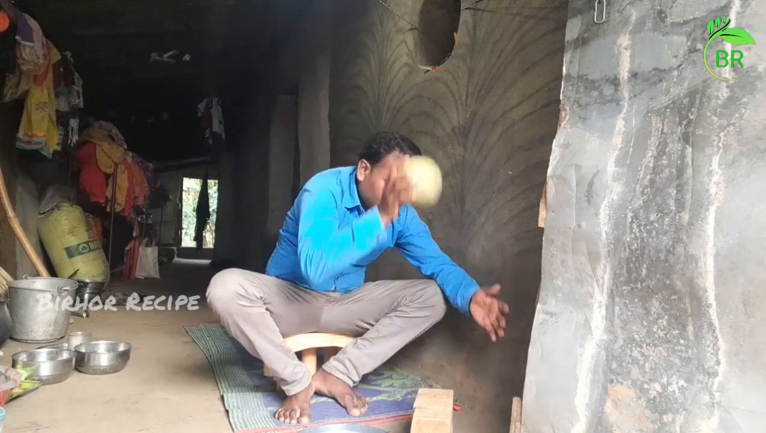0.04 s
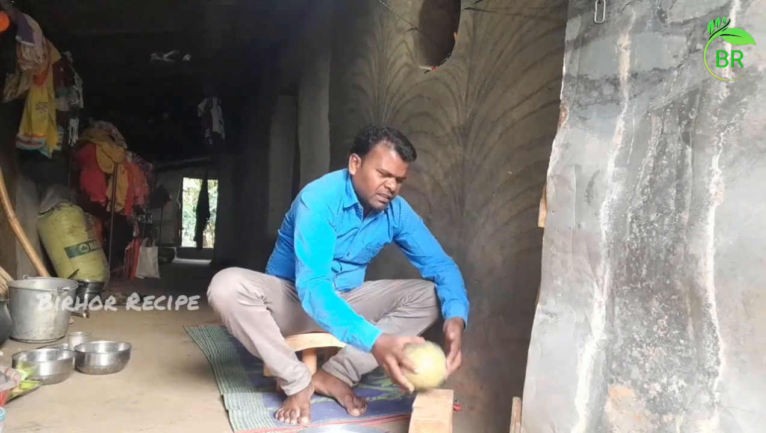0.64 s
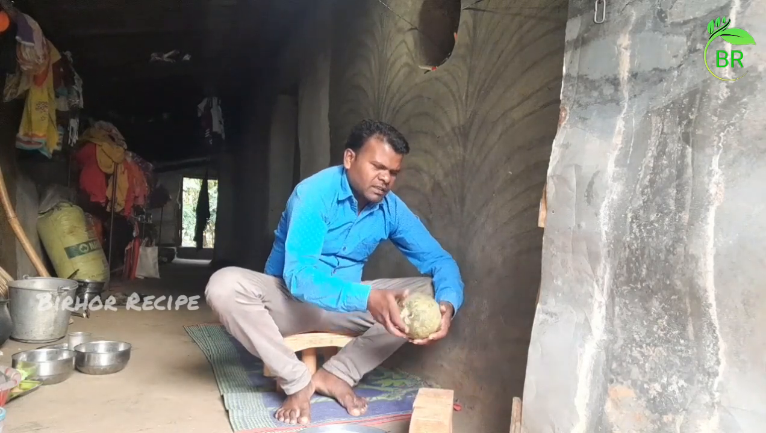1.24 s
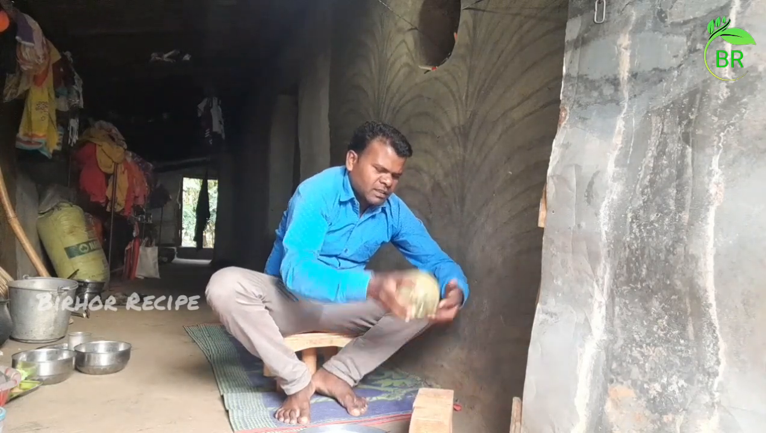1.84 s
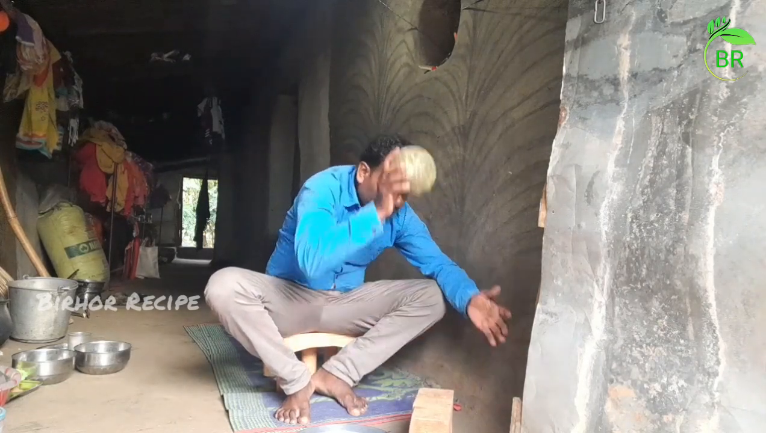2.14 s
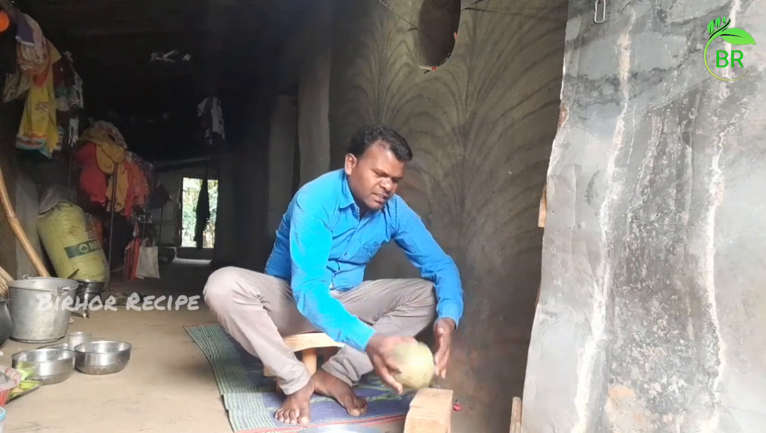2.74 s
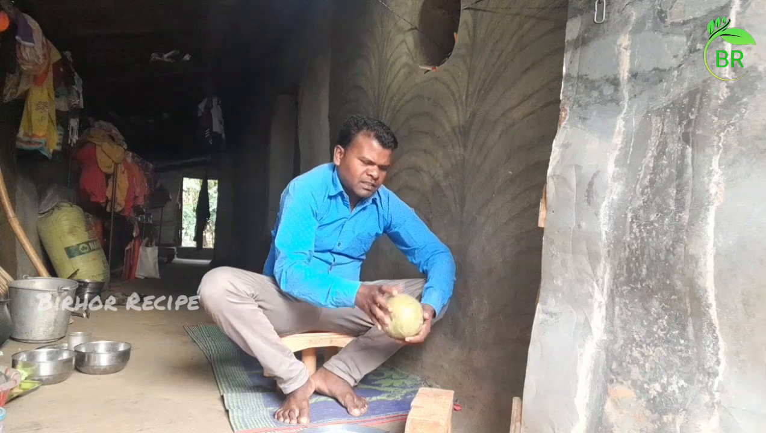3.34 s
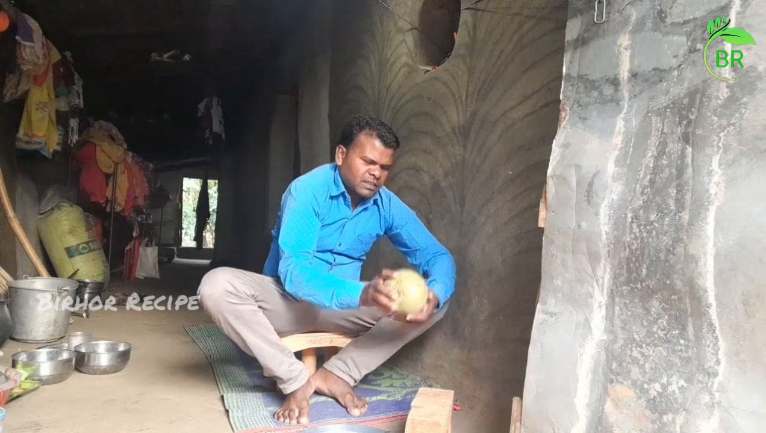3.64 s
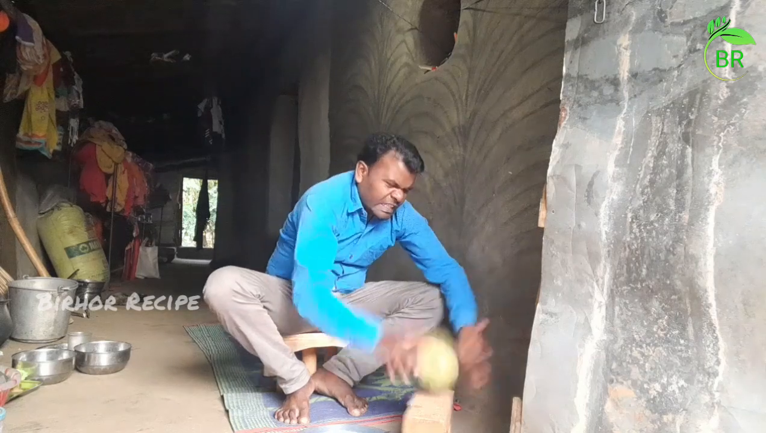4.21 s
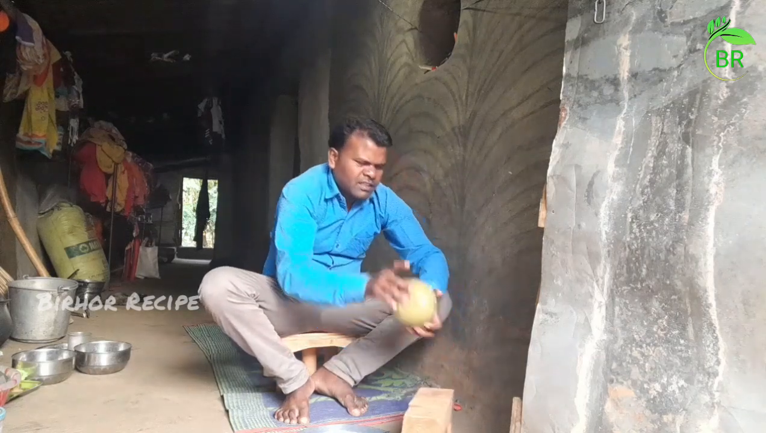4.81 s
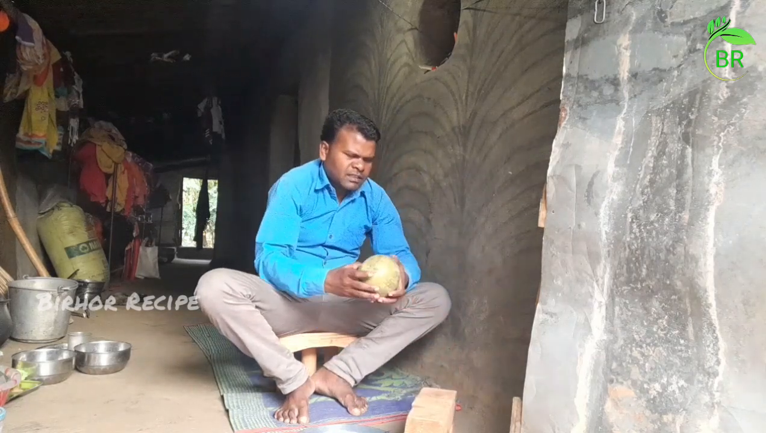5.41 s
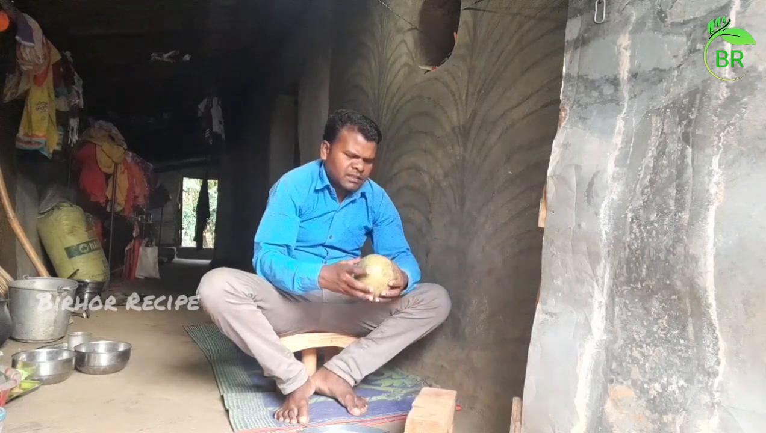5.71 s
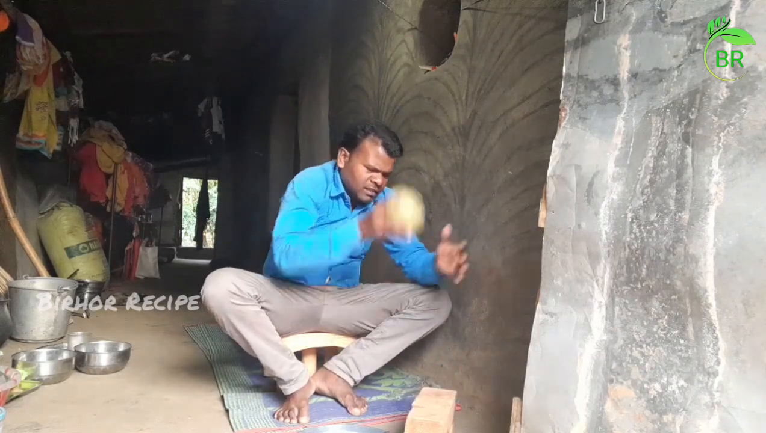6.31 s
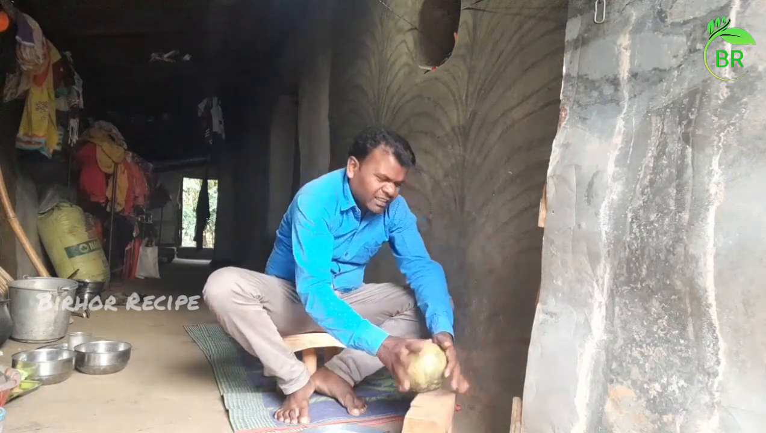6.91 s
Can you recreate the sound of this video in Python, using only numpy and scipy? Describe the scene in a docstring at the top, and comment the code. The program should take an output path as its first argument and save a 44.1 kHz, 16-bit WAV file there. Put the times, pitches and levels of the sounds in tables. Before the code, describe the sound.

A hard-shelled fruit is slammed on a wooden block four times in a small earthen room. Each blow follows a faint sleeve swish and lands as a loud, sharp crack with a low thud through block and floor, dying away quickly. The first comes at 0.3 seconds, followed by a woody knock and ticking shell chips around 0.5. The second lands at 2.4 seconds, with another knock just after. A bird gives a very faint, thin double chirp outside at 2.9. The third blow hits at 4.3 seconds, followed by a knock, then a run of lighter knocks and a chip tick until 5 seconds. The last crack comes at 6.8 seconds, with a bright chip tick and a small knock near 7. Sleeves and palms rustle softly between blows, over a quiet, steady low rumble and thin hiss.

```python
"""A faint swish of sleeve, then a sharp crack: a hard-shelled fruit is slammed on a wooden block,
four times in all, in a small earthen room. Each blow snaps on the shell and thuds through block
and floor. The fruit drops back with softer knocks, and chips of shell tick down.
Sleeves and palms rustle between the blows, and a bird chirps faintly outside, over a low room tone."""
import sys
import numpy as np
from scipy import signal
from scipy.fft import rfft, irfft, next_fast_len
from scipy.io import wavfile
from scipy.ndimage import uniform_filter1d

SR = 44100
rng = np.random.default_rng(int(sys.argv[2]) if len(sys.argv) > 2 else 0)


def wav_out(sig):
    """Save sig, one row per channel (or a flat mono array), as 16-bit PCM at SR to the path in sys.argv[1]."""
    wavfile.write(sys.argv[1], SR, np.round(np.clip(np.atleast_2d(sig).T, -1, 1) * 32767).astype(np.int16))


N = 315315

# full blows: (time [s], crack [dB], treble tilt [dB/octave], shell ring [factor],
# block thud [dB], floor boom [dB], thud pitch [factor])
BLOW_HITS = [(0.2844, 15, -0.12, 0.93, -17.5, -22, 0.93), (2.3974, 15.5, -1, 0.99, -25, -22.5, 0.97),
             (4.2787, 15.5, -0.42, 0.71, -18.5, -20.5, 0.97), (6.7633, 12, 0.05, 0.43, -15, -17, 0.99)]
# soft knocks on the block: (time [s], clack [dB], shell tick [dB], thud [dB], thud pitch [factor])
SOFT_KNOCKS = [(0.452, 6.5, -13.5, -17, 1), (2.5593, 7, -10.5, -20.5, 1.05), (4.4237, 0, -17.5, -25, 1.17),
               (4.68, -6, -36, -22.5, 1.04), (4.748, -14.5, -46, -28, 0.957),
               (4.8185, -7.5, -33, -26.5, 1.07), (4.9309, -17, -51, -33.5, 1.11),
               (4.944, -21, -38, -37, 1.15), (4.984, -24, -36, -37, 0.756),
               (6.961, -18.5, -45.5, -34, 1.22)]
# chips of shell landing: (time [s], level [dB])
CHIP_LANDINGS = [(0.492, -8), (0.53, -5.5), (1.057, -46), (4.853, -11), (6.826, -1.5), (6.972, -24.5)]
# sleeves and palms lifting or turning the fruit: (peak time [s], level [dB], swell [s], fade [s])
HAND_RUBS = [(0.01, -72.5, .1, 0.11), (1.08, -78.5, 0.037, 0.23), (2.131, -66.5, 0.37, 0.42),
             (3.171, -72.5, 0.084, 0.057), (4.03, -67.5, 0.24, 0.45), (4.769, -60.5, 0.14, 0.19),
             (4.97, -57, 0.087, 0.13), (5.32, -64.5, 0.16, 0.21), (6.08, -67, .18, .15),
             (6.32, -56.5, 0.14, 0.12), (7.14, -64, 0.19, 0.11)]
# the bird's slurred notes: (time [s], level [dB])
BIRD_SLURS = [(2.902, -72.5), (2.945, -74.5)]

# resonances of the shell against the wood: (frequency [Hz], width [Hz], boost [dB])
SHELL_PEAKS = [(527, 70, 3.5), (666, 18, 9), (750, 28, 4.5), (1050, 40, 4.5), (1107, 24, 3.5),
               (1230, 24, 4), (1440, 18, 6), (1470, 41, 3), (1723, 35, 6), (1830, 24, 3), (1950, 54, 6),
               (2180, 36, 3.5), (2640, 430, 3.5), (3800, 88, -2), (4440, 500, 2.5), (5550, 60, 3),
               (6100, 750, -3)]
# resonances of a chip: (frequency [Hz], width [Hz], boost [dB])
CHIP_PEAKS = [(2070, 650, 12.5), (2460, 320, 10), (2800, 230, 12.5), (3855, 180, 12.5), (4490, 210, 12),
              (5880, 300, 1), (6800, 400, 9.5)]
# modes of the block on the floor: (frequency [Hz], level [dB], t60 [s])
BLOCK_MODES = [(106, 1, .19), (88, -10, .22), (121, -5, .16), (150, -10, .13), (205, -14, .05),
               (296, -2, .075), (380, -18, .06)]
# low modes of floor and room: (frequency [Hz], level [dB], t60 [s])
BOOM_MODES = [(52, -21, 0.22), (71.4, -2.5, 0.15), (84, 3, 0.065), (109.3, 1.5, 0.066), (152, -7.5, 0.15),
              (238, -17, 0.22)]
# tone of the crack: (frequency [Hz], level [dB])
CRACK_EQ = [(40, -31.5), (150, -10.5), (300, -6.5), (600, -1.5), (1200, -3.5), (2200, 0), (3500, -0.5),
            (6000, 0), (9000, 0), (16000, -7.5)]
# tone of a chip's tick: (frequency [Hz], level [dB])
CHIP_EQ = [(100, -31), (1000, -27), (2000, -17.5), (6000, -15), (16000, -7.5)]
# tone of sliding cloth: (frequency [Hz], level [dB])
CLOTH_EQ = [(60, -4), (150, -1.5), (400, 0), (900, -4), (1300, -3.5), (1850, -0.5), (2400, -5.5),
            (3500, -7.5), (6000, -6), (9000, -2), (15000, -4.5)]
# tone of the background air: (frequency [Hz], level [dB])
AIR_EQ = [(15, -1), (30, 1.5), (50, 4.5), (100, -6), (160, -21.5), (320, -21.5), (700, -28), (1500, -33.5),
          (3200, -40), (6000, -32.5), (9000, -23), (15000, -23.5)]

# direct sound and the nearest walls: (delay [s], left [dB], right [dB])
EARLY_TAPS = [(0.0003, -15, -18), (0.0019, -9, -14.5), (0.0026, -20.5, -19), (0.0047, -24, -10)]
# arrivals of the boom by way of far walls: (delay [s], level [dB])
BOOM_TAPS = [(0.004, -13), (0.03, 0), (0.072, -6.5)]
# bass echoes from the far rooms of the house: (delay [s], level [dB])
FAR_ROOM_TAPS = [(0.075, -11.5), (0.131, -27), (0.166, -35), (0.235, -30)]
# decay of the room's tail: (frequency [Hz], t60 [s])
ROOM_DECAY = [(60, 0.9), (110, 0.46), (300, .33), (700, .27), (2000, 0.28), (3000, .23), (5000, 0.2),
              (9000, 0.21), (16000, 0.18)]
# likeness of left and right in diffuse sound: (frequency [Hz], correlation [0-1])
STEREO_LIKENESS = [(50, 0.91), (150, 0.79), (300, 0.72), (640, 0.41), (1400, 0.24), (16000, 0.022)]
# colour of the two microphone ports: (frequency [Hz], left [dB], right [dB])
MIC_EQ = [(20, -26, -22), (34.2, -13, -1), (57, -3, 4.5), (110, 3, 5), (278, 5.5, 8.5), (670, 3.5, 4.5),
          (2000, 1, 3.5), (6430, 2.5, 3.5), (7700, -10.5, -21), (8100, -12.5, -26.5), (9200, -9, -13),
          (12000, -9, -6.5), (15800, -12, -9.5)]


def cracks(splinter_s=0.001, splinter_share=1.1):
    """The shell meets the wood with a snap and a few milliseconds of splintering."""
    out, hz, t = np.zeros(N), bins(size=8192), np.arange(1024) / SR
    for s, db, tilt_db, shell_ring, *_ in BLOW_HITS:
        burst = rng.standard_normal(len(t)) * t * np.exp(-t / splinter_s)
        burst *= splinter_share / np.linalg.norm(burst)
        burst[0] += 1  # the snap
        # flattened splinters smear the snap in time and leave its colour to the shell
        burst = irfft(np.exp(1j * np.angle(rfft(burst))))[:len(t) // 2]
        tilt = tilt_db * np.log2(hz / 2000 + .2)
        colour = curve(CRACK_EQ, hz) + shell_ring * resonances(SHELL_PEAKS, hz) + tilt
        add(out, s, amp(db) * np.convolve(burst / np.linalg.norm(burst), click(colour)))
    return out


def thuds(lag_s=.003, soft_hz=118, firm_hz=159, far_cutoff_hz=190):
    """Every knock and blow rings the block; blows also shake the floor, and the far rooms answer."""
    out, boom = np.zeros(N), ring(BOOM_MODES, rise_s=0.0015)
    for s, clack_db, _, thud_db, pitch in SOFT_KNOCKS:
        corner_hz = soft_hz + firm_hz * amp(clack_db)  # harder knocks are brighter
        contact_s = 1 / corner_hz  # and have a faster attack
        add(out, s + lag_s, amp(thud_db) * ring(BLOCK_MODES, contact_s, corner_hz, pitch))
    for s, *_, thud_db, boom_db, pitch in BLOW_HITS:
        add(out, s, amp(thud_db) * ring(BLOCK_MODES, rise_s=0.0057, pitch=pitch))
        for delay, db in BOOM_TAPS:
            add(out, s + delay, amp(boom_db + db) * boom)
    echoes = np.zeros(N)
    for delay, db in FAR_ROOM_TAPS:
        add(echoes, delay, amp(db) * out)
    return out + signal.sosfilt(signal.butter(2, far_cutoff_hz, fs=SR, output="sos"), echoes)


def clacks(corner_hz=1200, rolloff_db=14, lag_s=0.0019, shell_ring=0.2):
    """A slow contact starts with a faint tick of the shell, then a dull woody clack."""
    out, hz = np.zeros(N), bins(size=8192)
    shell = curve(CRACK_EQ, hz) + shell_ring * resonances(SHELL_PEAKS, hz)
    treble_cut = rolloff_db * np.log10(1 + (hz / corner_hz) ** 4)
    tick, clack = click(shell), click(shell - treble_cut)
    for s, clack_db, tick_db, *_ in SOFT_KNOCKS:
        add(out, s, amp(tick_db) * tick)
        add(out, s + lag_s, amp(clack_db) * clack)
    return out


def chips(mean_gap_s=0.0029, bounce_db=-7):
    """Small hard pieces tick brightly on the floor and skitter to rest."""
    out, hz = np.zeros(N), bins(size=4096)
    tick = click(curve(CHIP_EQ, hz) + resonances(CHIP_PEAKS, hz))
    for s, db in CHIP_LANDINGS:
        gaps = mean_gap_s * rng.exponential(size=4)
        for bounce, delay in enumerate(np.cumsum(gaps) - gaps[0]):
            add(out, s + delay, amp(db + bounce * bounce_db) * tick)
    return out


def rustle(swish_db=-66, grain_db=0.47):
    """Cloth and skin slide in uneven slips; each downswing swishes until the blow stops the arm."""
    rubs = sum(rub_power(*row) for row in HAND_RUBS)
    swishes = sum(rub_power(s, swish_db, swell_s=.09, fade_s=.06) for s, *_ in BLOW_HITS)
    slips = unit_rms(uniform_filter1d(rng.standard_normal(N), size=700))
    return hiss(CLOTH_EQ) * np.sqrt(rubs + swishes) * amp(grain_db * slips)


def rub_power(peak_s, db, swell_s, fade_s):
    """One movement swells to its fastest moment and fades."""
    t = np.arange(N) / SR - peak_s
    return (amp(db) * np.exp(-np.maximum(-t / swell_s, t / fade_s))) ** 2


def bird(slur_s=0.033, top_hz=4627, bottom_hz=3746, slide_s=.018):
    """A thin whistle slides down twice."""
    t, out = np.arange(0, slur_s, 1 / SR), np.zeros(N)
    hz = bottom_hz + (top_hz - bottom_hz) * np.exp(-t / slide_s)
    envelope = np.sqrt(abs(np.sin(np.pi * t / slur_s)))
    slur = envelope * np.sin(2 * np.pi * np.cumsum(hz) / SR)
    for s, db in BIRD_SLURS:
        add(out, s, amp(db) * slur)
    return out


def room(x, early_db, tail_db, build_s, right_lag_s=0.00012):
    """A few hard early reflections, then a dense tail that dies faster in the treble."""
    hz, t, spectra = signal.stft(noise_pair(SR), SR, nperseg=512)
    decay = amp(-60 * t / curve(ROOM_DECAY, hz)[:, None])
    tail = signal.istft(spectra * decay, SR, nperseg=512)[1][:, :SR]
    tail *= 1 - np.exp(-np.arange(SR) / SR / build_s)
    taps = amp(tail_db) * tail / np.linalg.norm(tail[0])
    for delay, left_db, right_db in EARLY_TAPS:
        add(taps[0], delay, amp([early_db + left_db]))
        add(taps[1], delay + right_lag_s, amp([early_db + right_db]))
    return convolve(x, taps)


def room_tone(db=-64):
    """A steady bed of low rumble and thin hiss."""
    return amp(db) * hiss(AIR_EQ)


def ring(modes, rise_s, corner_hz=np.inf, pitch=1):
    """Dying modes swell over the time of contact; a soft contact misses the high ones."""
    t = np.arange(SR // 2) / SR
    sines = sum(amp(db - 60 * t / t60) * np.sin(2 * np.pi * hz * pitch * t) / (1 + (hz / corner_hz) ** 2)
                for hz, db, t60 in modes)
    return (1 - np.exp(-t / rise_s)) * sines


def click(gain_db):
    """The tightest causal pulse that has this spectrum."""
    cepstrum = irfft(np.maximum(gain_db, -100) * np.log(10) / 20)
    half = len(cepstrum) // 2
    cepstrum[1:half] *= 2
    cepstrum[half + 1:] = 0
    return irfft(np.exp(rfft(cepstrum)))


def resonances(peaks, hz):
    """Bell-shaped peaks in dB."""
    return sum(db / (1 + (2 * (hz - centre) / width) ** 2) for centre, width, db in peaks)


def hiss(eq):
    """Diffuse noise of a given colour."""
    size = next_fast_len(N, True)
    spectrum = rfft(noise_pair(size)) * amp(curve(eq, bins(size)))
    return unit_rms(irfft(spectrum, size)[:, :N])


def noise_pair(size):
    """Stereo noise, narrow in the bass and wide in the treble."""
    left, unrelated = rfft(rng.standard_normal((2, size)))
    likeness = curve(STEREO_LIKENESS, bins(size))
    right = likeness * left + np.sqrt(1 - likeness ** 2) * unrelated
    return irfft(np.array([left, right]), size)


def curve(points, hz):
    """Breakpoints joined along a log frequency axis."""
    point_hz, value = np.transpose(points)
    return np.interp(np.log(hz + 1), np.log(point_hz + 1), value)


def amp(db):
    return 10 ** (np.asarray(db) / 20)


def unit_rms(x):
    return x / np.sqrt(np.mean(x ** 2) + 1e-20)


def add(mix, s, sound):
    part = mix[..., max(round(s * SR), 0):][..., :sound.shape[-1]]
    part += sound[..., :part.shape[-1]]


def bins(size):
    return np.fft.rfftfreq(size, 1 / SR)


def convolve(x, taps):
    return signal.fftconvolve(np.atleast_2d(x), np.atleast_2d(taps), axes=1)[:, :N]


def scene(thud_send_db=-19, bird_send_db=-2, bird_direct_db=-8):
    """The cracks fill the room, small contacts sit drier, and the bass arrives mostly direct."""
    bass, chirp = thuds(), bird()
    send = cracks() + amp(thud_send_db) * bass + amp(bird_send_db) * chirp
    roomy = room(send, early_db=8.0, tail_db=4.5, build_s=0.0066)
    close = room(clacks() + chips(), early_db=6.0, tail_db=0.5, build_s=0.001)
    return roomy + close + bass + amp(bird_direct_db) * chirp + rustle() + room_tone()


def record(dry, cutoff_hz=16400):
    """Each microphone port colours its channel, the sharpest peaks clip, and the top is cut off."""
    hz, mic = bins(size=8192), np.array(MIC_EQ)
    ports = [click(curve(mic[:, [0, side]], hz)) for side in (1, 2)]
    clipped = np.clip(convolve(dry, ports), -1, 1)
    lowpass = signal.firwin(511, cutoff_hz, window=("kaiser", 9), fs=SR)
    return signal.oaconvolve(clipped, lowpass[None], "same", axes=1)


dry = scene()
out = record(dry)
wav_out(out)
```